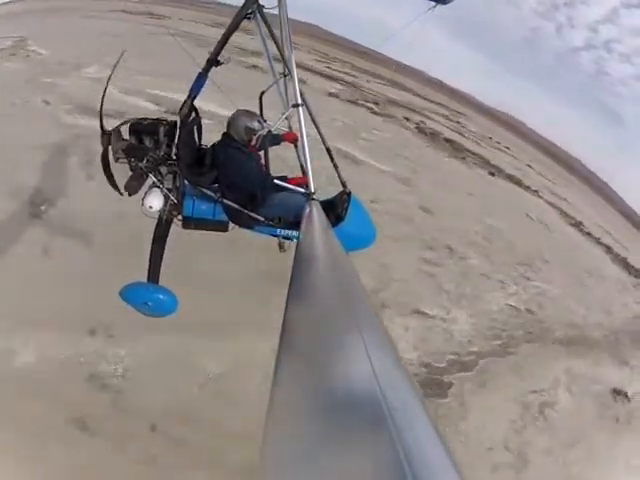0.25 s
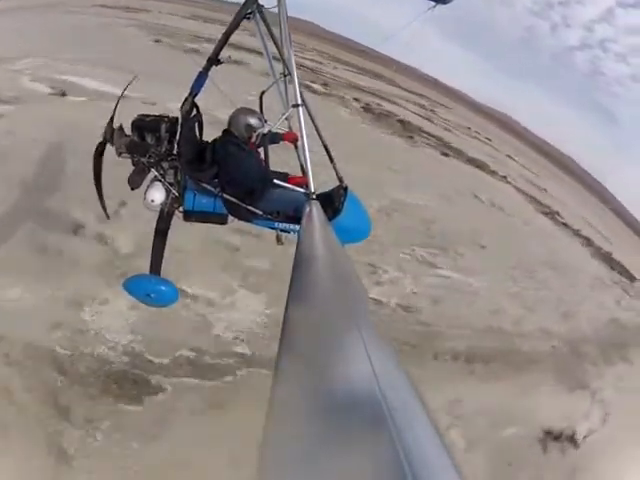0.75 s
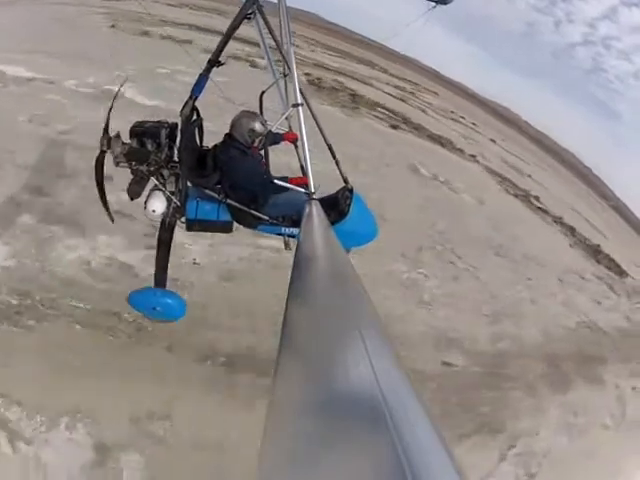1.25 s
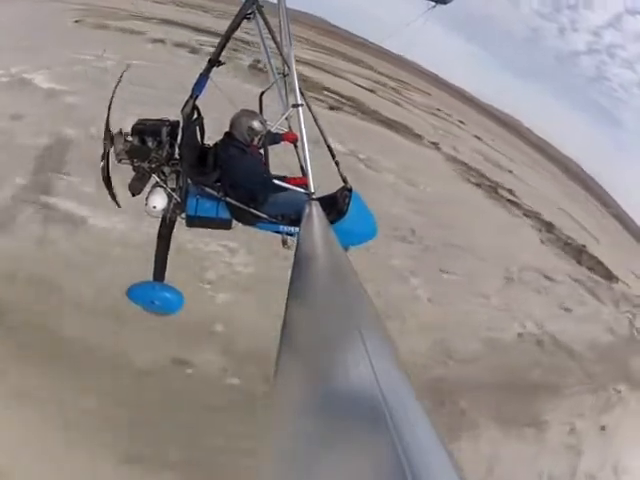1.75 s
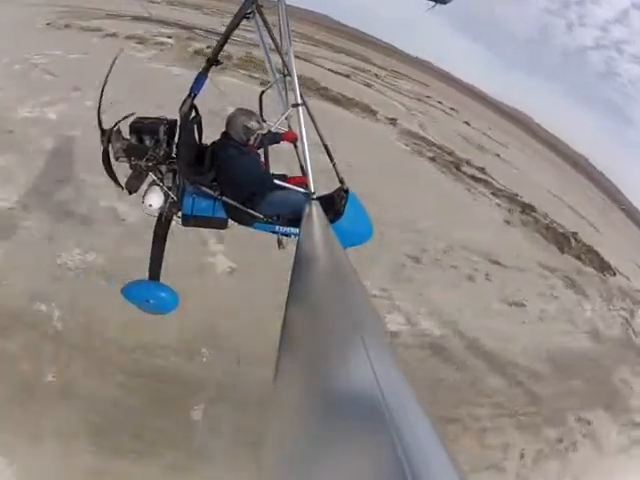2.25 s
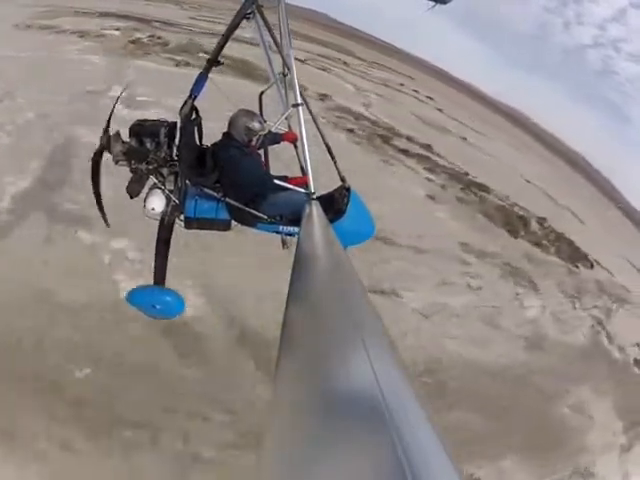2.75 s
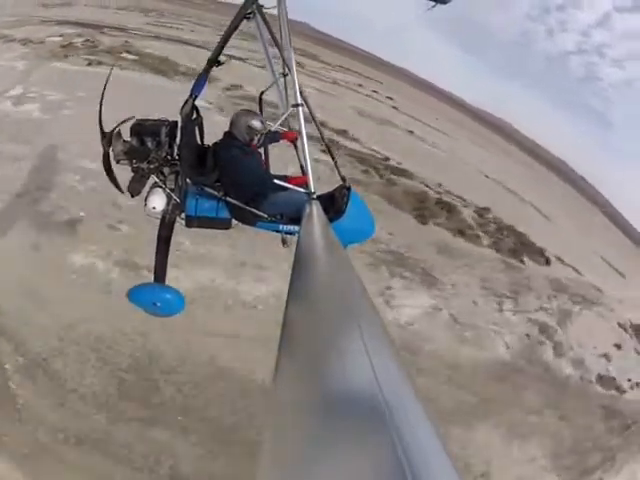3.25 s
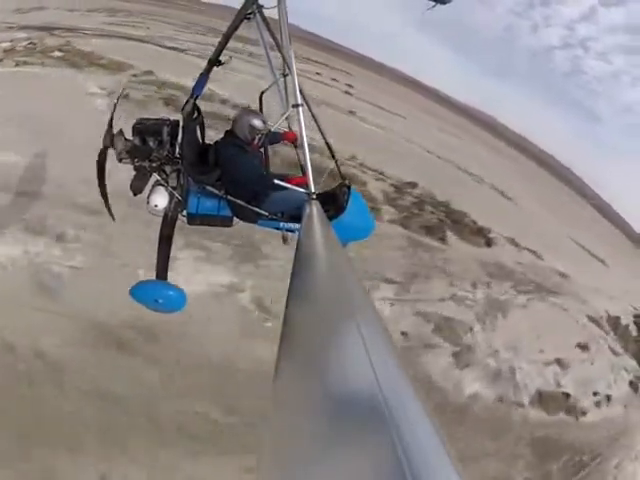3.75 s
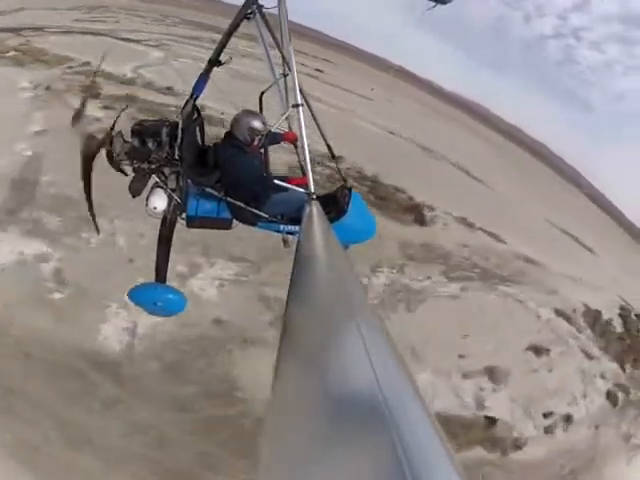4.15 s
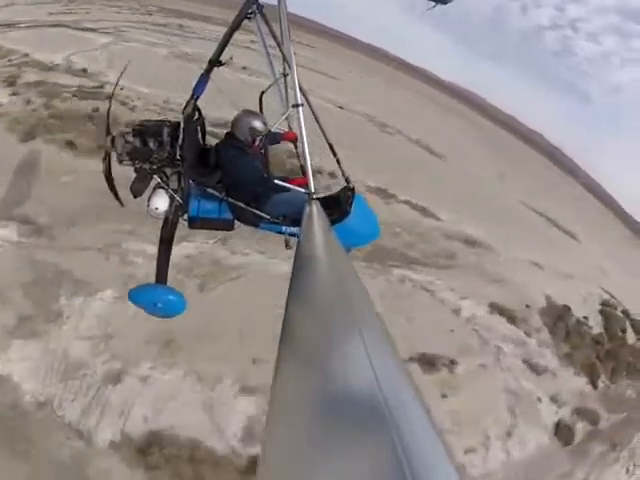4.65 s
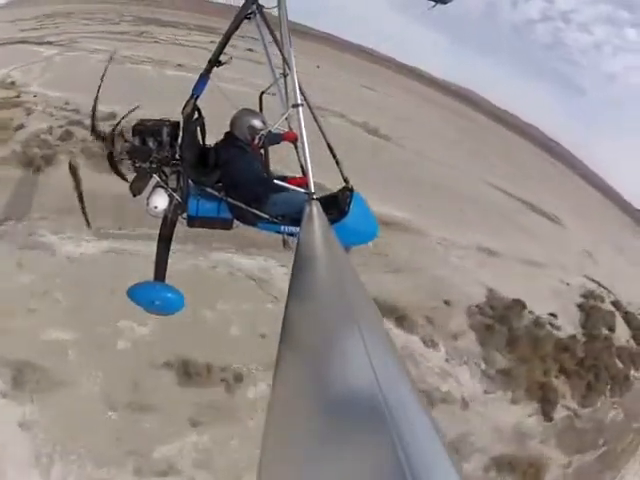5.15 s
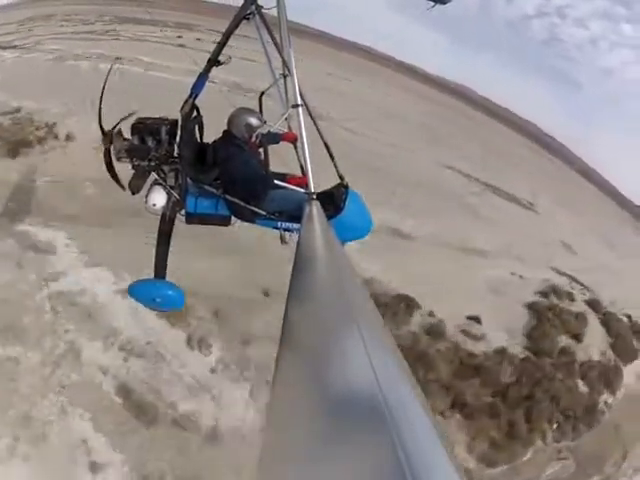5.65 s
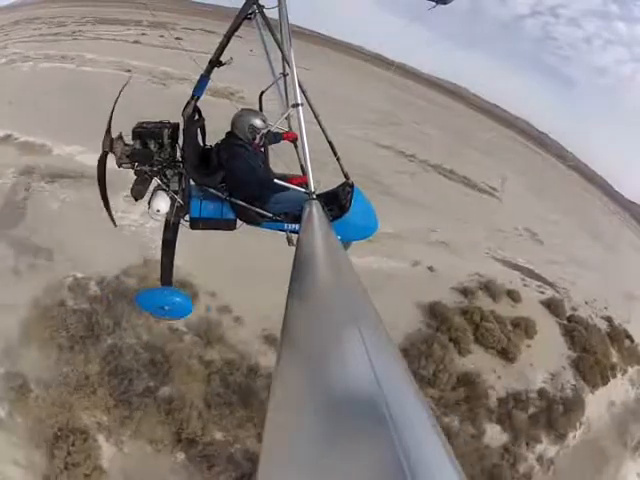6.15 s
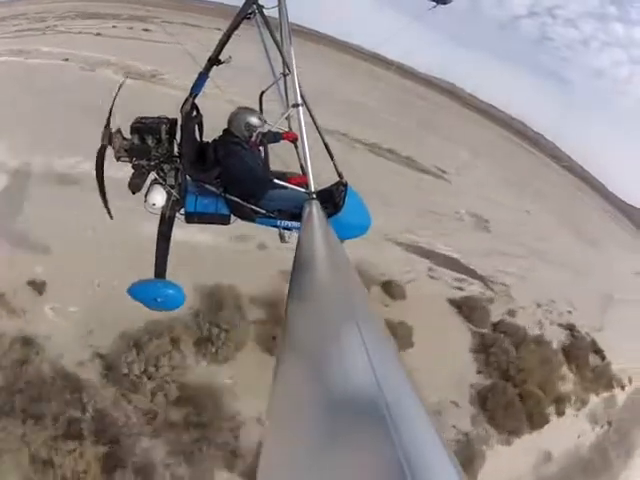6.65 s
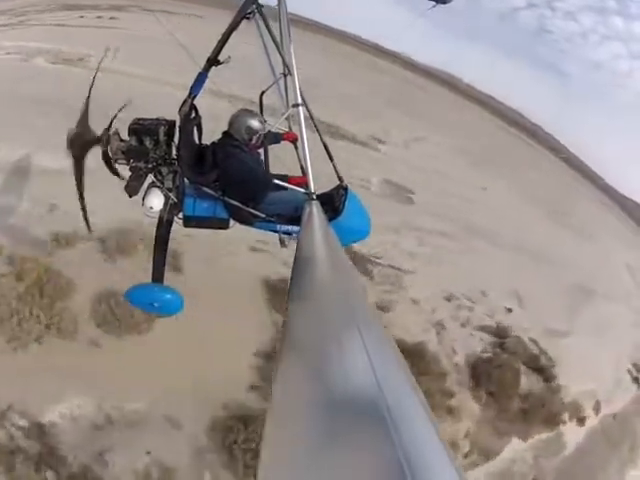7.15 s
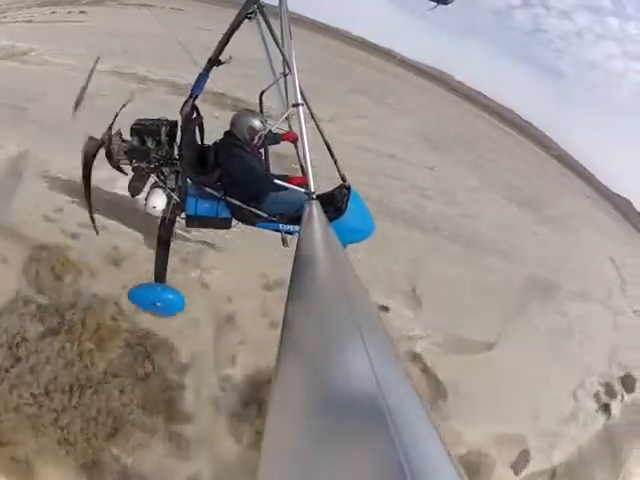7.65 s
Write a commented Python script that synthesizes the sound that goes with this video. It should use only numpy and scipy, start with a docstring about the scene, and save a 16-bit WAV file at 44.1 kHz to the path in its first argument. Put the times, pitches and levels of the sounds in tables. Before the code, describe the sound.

A two-stroke microlight engine drones and buzzes steadily in flight, its pusher propeller rasping over a low, gusty rumble of air.

```python
"""A microlight trike cruises low over a desert, heard from a boom fixed to its own frame.
Throughout, a two-stroke twin drones as harmonics of its crank, buzzes, whines and clatters;
through a reduction gear it turns a three-blade propeller with tones, rasping noise and rumbling wash.
Short dull overload bursts of shaped noise near 0.5, 2.2 and 3.6 s; engine speed climbs until about 5 s, then sinks.
A small camera clips peaks and holds coarse samples, adding a fizzy top."""
import sys
import numpy as np
from scipy import signal
from scipy.fft import rfft, irfft
from scipy.io import wavfile
from scipy.ndimage import uniform_filter1d

SR = 44100
rng = np.random.default_rng(int(sys.argv[2]) if len(sys.argv) > 2 else 0)


def unload_audio(sound):
    """Save the sound as a 16-bit wav file, at the path given as the first command line argument."""
    columns = np.transpose(np.atleast_2d(sound))
    # keep every value between -1 and 1, then stretch to whole-number steps
    steps = np.round(np.clip(columns, -1, 1) * 32767)
    wavfile.write(sys.argv[1], SR, steps.astype(np.int16))


N = 347508
GEAR_RATIO = 55 / 21  # crank turns per propeller turn


def undb(db):
    """Decibels to amplitude gain."""
    return 10 ** (np.asarray(db) / 20)


def curve(table):
    """A timed table, interpolated to one value per sample."""
    return np.interp(np.arange(N) / SR, *np.transpose(table))


def spectrum_db(points, hz):
    """Read a spectrum in dB on a log-frequency axis."""
    at_hz, db = np.transpose(points)
    return np.interp(np.log(hz + 1e-3), np.log(at_hz), db)


def walk(rate_hz):
    """Smooth chance with a spread of 1 and about rate_hz new values a second."""
    step = max(int(SR / rate_hz), 2)
    steps = np.repeat(rng.standard_normal(N // step + 2), step)
    start = rng.integers(step)
    smooth = uniform_filter1d(steps, step)[start:][:N]
    return smooth / smooth.std()


def colour(noise, points, modes=()):
    """Shape white noise to a spectrum in dB per Hz, lifted at each resonance."""
    hz = np.arange(N // 2 + 1) * SR / N
    db = spectrum_db(points, hz)
    for centre_hz, width_hz, lift_db in modes:
        db = db + lift_db / (1 + (2 * (hz - centre_hz) / width_hz) ** 2)
    top_hz = points[-1][0]
    rolloff = 1 / (1 + (hz / (2 * top_hz)) ** 4)
    spectrum = rfft(noise / noise.std()) * undb(db) * rolloff
    return irfft(spectrum, N) * np.sqrt(SR / 2)


def tone(turns, rms_db, flutter, rate_hz):
    """A partial that starts each cycle with suction; turbulent air shakes its size and phase."""
    angle = 2 * np.pi * turns
    in_phase = (1 + flutter * walk(rate_hz)) * np.cos(angle)
    quadrature = flutter * walk(rate_hz) * np.sin(angle)
    unit_rms = np.sqrt(2 / (1 + 2 * flutter ** 2))
    return -(in_phase + quadrature) * undb(rms_db) * unit_rms


def blades(crank):
    """Swings between 1 and -1 once for each of the three passing blades."""
    return np.cos(2 * np.pi * 3 * crank / GEAR_RATIO)


# engine speed: start_s, crank_hz
CRANK_SPEED = [(0.0, 83.45), (0.6, 84.25), (1.28, 85.7), (1.64, 86.16), (2.2, 85.72), (2.8, 86.17),
               (3.6, 86.42), (3.76, 86.17), (4.32, 86.45), (5.04, 86.48), (5.96, 84.74), (6.12, 85),
               (6.44, 84.19), (7.0, 83.3), (7.48, 82.35), (7.88, 82.5)]


def crank_speed():
    """Crank turns per second, which set the pitch of every engine and propeller tone."""
    return curve(CRANK_SPEED)


# firing tone, two beats a turn, before trim: start_s, level_db
FIRING_LEVEL = [(0.0, -21.5), (0.28, -23.5), (0.68, -12.5), (0.96, -16.5), (1.24, -14), (1.44, -20),
                (1.92, -10.5), (2.2, -9.5), (2.56, -16), (3.04, -10.5), (3.84, -7.5), (4.76, -11),
                (4.96, -21.9), (5.56, -9.0), (5.92, -9), (6.16, -18.5), (6.52, -13), (7.88, -17)]
# overtone, three beats a turn, before trim: start_s, level_db
THIRD_LEVEL = [(0.0, -24), (0.2, -17.5), (0.36, -22.1), (0.48, -12.5), (0.8, -12), (0.92, -22.5),
               (1.2, -10.5), (1.36, -21.3), (1.48, -11.5), (1.6, -23), (2.0, -16.5), (2.28, -22.5),
               (3.4, -13.5), (3.96, -23), (4.84, -18.5), (6.76, -23), (6.96, -18), (7.88, -25)]
# overtone, four beats a turn, before trim: start_s, level_db
FOURTH_LEVEL = [(0.0, -27), (0.6, -20.5), (1.2, -34.5), (1.32, -24.0), (1.48, -20.5), (2.12, -23),
                (2.2, -28.5), (3.2, -29), (3.84, -35.5), (4.0, -24.5), (4.36, -28), (5.44, -20.5),
                (6.32, -36), (6.48, -24), (7.64, -31.1), (7.88, -28)]


def exhaust(crank, hz, crank_db=-15.5, lag_s=0.0017, drift_turns=0.15):
    """A steady crank tone, the firing tone at two a turn, and overtones drifting in phase in the airstream."""
    firing_db = 0.02 + curve(FIRING_LEVEL)
    third_db = 0.14 + curve(THIRD_LEVEL)
    fourth_db = 0.44 + curve(FOURTH_LEVEL)
    # the once-a-turn shake takes a slightly longer path than the firings
    first = tone(crank - lag_s * hz, crank_db, flutter=0.047, rate_hz=13)
    second = tone(2 * crank, firing_db, flutter=0.068, rate_hz=10)
    third = tone(3 * crank + drift_turns * walk(1.993), third_db, flutter=0.16, rate_hz=16)
    fourth = tone(4 * crank + drift_turns * walk(1.997), fourth_db, flutter=0.12, rate_hz=12)
    return first + second + third + fourth


# crank orders that the firings and gear teeth drive hard: crank_multiple
WHINE_ORDERS = [22, 24, 26, 27, 28, 35, 42, 44, 48, 50, 52, 54]
# weak crank orders, even ones, before flutter: pitch_hz, level_db
BUZZ_SPECTRUM = [(430, -39), (560, -56), (880, -41), (1400, -40), (1700, -45.5), (2100, -37), (2500, -43),
                 (2850, -60), (3080, -43), (3350, -53.5), (3700, -45), (4000, -52), (4900, -63),
                 (5700, -51.5)]


def buzz(crank, mean_hz, odd_db=-5.0, flutter=0.37, end_order=69):
    """The comb of crank harmonics; two alike cylinders favour the even ones."""
    shakes = [1 + flutter * walk(17) for _ in range(7)]  # shared out among the orders
    orders = np.setdiff1d(np.arange(5, end_order), WHINE_ORDERS)
    level_db = spectrum_db(BUZZ_SPECTRUM, orders * mean_hz) + odd_db * (orders % 2)
    sizes = np.sqrt(2) * undb(level_db)
    angle = (2 * np.pi * (crank % 1)).astype(np.float32)
    total = 0
    for order, size in zip(orders, sizes):
        phase = 2 * np.pi * rng.random()
        total = total + size * shakes[order % len(shakes)] * np.cos(int(order) * angle + phase)
    return total


# casing and gearbox resonances, before drive and trim: centre_hz, width_hz, level_db
WHINE_RESONANCES = [(1930, 180, -35), (2040, 120, -35), (2167, 31, -22.5), (2200, 146, -26),
                    (2327, 29, -24), (2381, 32, -27.5), (2433, 54, -25.5), (3010, 100, -35),
                    (3538, 93, -35), (3617, 115, -31.5), (3790, 100, -31.5), (4250, 26.9, -38.5),
                    (4242, 100, -37.5), (4315, 40, -42), (4426, 92, -36.5), (4500, 100, -44)]
# drive of each whine order: drive_db
WHINE_DRIVE = [0, -1.5, -0.36, -8.5, 1, -5.5, -0.7, -6, -1, 0.1, -1, -3.5]


def whine(crank, hz, load, level_db=0.36, load_db_per_hz_per_s=0.43):
    """Strong orders swell and fade as speed carries them across the casing's resonances; load lifts them."""
    grid_hz = np.arange(1, 6000)
    power = 0
    for centre_hz, width_hz, peak_db in WHINE_RESONANCES:
        size = undb(peak_db) / (1 + (2 * (grid_hz - centre_hz) / width_hz) ** 2)
        power = power + size ** 2
    response_db = 10 * np.log10(power)
    total = 0
    for order, drive_db in zip(WHINE_ORDERS, WHINE_DRIVE):
        order_db = drive_db + np.interp(order * hz, grid_hz, response_db)
        total = total + tone(order * crank + rng.random(), order_db, flutter=0.17, rate_hz=30)
    return total * undb(level_db + load_db_per_hz_per_s * load)


# clatter noise: pitch_hz, level_db_per_hz
CLATTER_SPECTRUM = [(1000, -76.5), (1750, -62.5), (2100, -53.5), (2430, -52), (2650, -63.5), (2850, -68),
                    (3600, -61.5), (4050, -69), (4600, -68), (4900, -73.5), (5400, -70), (5800, -69.5)]
# crankcase resonances: centre_hz, width_hz, lift_db
CASING_RESONANCES = [(2300, 80, 2.5), (3080, 100, 8.5), (3650, 230, 3.5)]


def clatter(crank, turn_db=1.2, firing_db=.5, slap_db=1.4, flicker_db=0.66):
    """Gas and piston noise pulses within each turn and rings the crankcase."""
    angle = 2 * np.pi * crank
    pulse_db = -turn_db * np.cos(angle) - firing_db * np.cos(2 * angle) - slap_db * np.cos(3 * angle)
    gate = undb(pulse_db + flicker_db * walk(30))
    return colour(gate * rng.standard_normal(N), CLATTER_SPECTRUM, CASING_RESONANCES)


# propeller tones, alone and beating with the crank: crank_multiple, propeller_multiple
PROPELLER_ORDERS = [(0, 1), (0, 3), (0, 6), (0, 12), (0, 15), (1, -1), (1, 1), (2, -1), (2, 1), (3, 1),
                    (19, -6), (19, -3)]
# level of each propeller tone: level_db
PROPELLER_LEVEL = [-40, -36.5, -30, -63, -57, -47.5, -27, -32.5, -48, -31.5, -41.5, -38.5]


def propeller(crank):
    """Blade tones, and side tones where the turning propeller sways the engine's sound."""
    shaft = crank / GEAR_RATIO
    total = 0
    for (crank_order, shaft_order), level_db in zip(PROPELLER_ORDERS, PROPELLER_LEVEL):
        turns = crank_order * crank + shaft_order * shaft
        total = total + tone(turns, level_db, flutter=0.69, rate_hz=11)
    return total


# blade noise, before swell: pitch_hz, level_db_per_hz
RASP_SPECTRUM = [(200, -80), (540, -72.5), (700, -62.5), (900, -60), (1450, -55), (1600, -57), (1750, -64),
                 (2200, -68)]
# frame tube resonances: centre_hz, width_hz, lift_db
FRAME_RESONANCES = [(625, 32, 4), (725, 21, 5.5), (834, 62, 6.5), (970, 57, 7.5), (1120, 26, 2),
                    (1249, 41, 7), (1420, 33, 1), (1560, 50, 3)]


def rasp(crank, hz, blade_db=1.9, flicker_db=0.64, inflow_db=0.64, rise_db_per_hz=0.36, level_db=0.22):
    """Blades tear the engine's wake, louder with speed, uneven with inflow; frame tubes colour the noise."""
    swell_db = level_db + rise_db_per_hz * (hz - hz.mean()) + inflow_db * walk(5)
    gate = undb(blade_db * blades(crank) + flicker_db * walk(14))
    noise = colour(gate * rng.standard_normal(N), RASP_SPECTRUM, FRAME_RESONANCES)
    return noise * undb(swell_db)


# propeller wash and shaking boom, before gusts: pitch_hz, level_db_per_hz
WASH_SPECTRUM = [(14, -68), (25, -39.5), (32, -37.5), (42, -48), (54, -39), (72, -54), (120, -44.5),
                 (155, -52.5), (195, -40.5), (230, -45.5), (275, -39), (320, -45), (365, -56.5),
                 (540, -73.5)]


def wash(gust_db=0.9):
    """Low, gusty rumble of churned air and the shaking boom."""
    return colour(rng.standard_normal(N), WASH_SPECTRUM) * undb(gust_db * walk(6))


# overload bursts: peak_s, peak_gain_db
OVERLOAD_TIMES = [(.461, -23), (2.15, -23.5), (3.588, -21)]
# their dull colour, before peak gain: pitch_hz, level_db_per_hz
OVERLOAD_SPECTRUM = [(150, -28), (450, -32), (800, -29), (1600, -48), (4000, -62)]


def overload_bursts(length_s=0.0069):
    """The camera overloads for a moment: noise under short bell-shaped swells."""
    t = np.arange(N) / SR
    swells = sum(undb(gain_db) * np.exp(-((t - peak_s) / length_s) ** 2) for peak_s, gain_db in OVERLOAD_TIMES)
    return swells * colour(rng.standard_normal(N), OVERLOAD_SPECTRUM)


def scene(load_s=0.37):
    """One crankshaft drives engine and propeller; open air gives no echo."""
    hz = crank_speed()
    crank = np.cumsum(hz) / SR  # turns
    # smoothed speed gain, Hz per s: the engine pulls harder while it speeds up
    load = uniform_filter1d(np.gradient(hz) * SR, int(load_s * SR))
    engine = exhaust(crank, hz) + buzz(crank, hz.mean()) + whine(crank, hz, load) + clatter(crank)
    air = propeller(crank) + rasp(crank, hz) + wash()
    return (engine + air + overload_bursts())[None]


def lowpass(x, cutoff_hz, order):
    """A steep treble cut."""
    sos = signal.ellip(order, .2, 80, cutoff_hz, fs=SR, output="sos")
    return signal.sosfilt(sos, x)


def record(dry, input_hz=5820, ceiling=.93, hold_hz=12000, top_hz=15350):
    """The camera clips tall peaks and holds each coarse sample, mirroring the sound into the treble."""
    clipped = np.clip(lowpass(dry, input_hz, order=9), -ceiling, ceiling)
    coarse = signal.resample(clipped, round(N * hold_hz / SR), axis=-1)
    held = np.repeat(coarse, 4, axis=-1)
    stairs = signal.resample(held, N, axis=-1)
    return lowpass(stairs, top_hz, order=11)


dry = scene()
out = record(dry)
unload_audio(out)
```